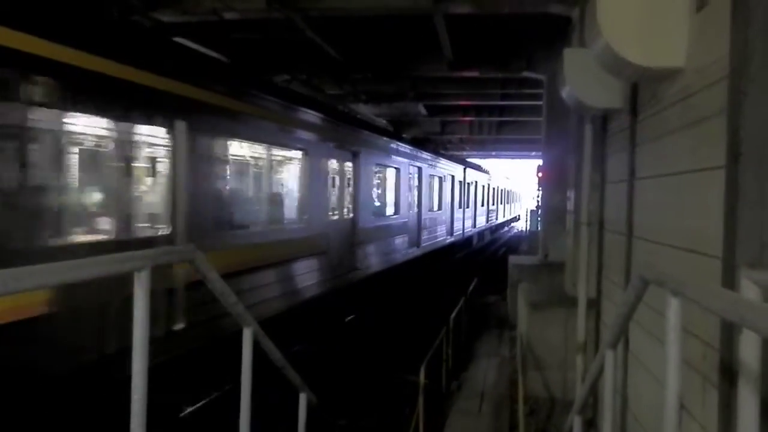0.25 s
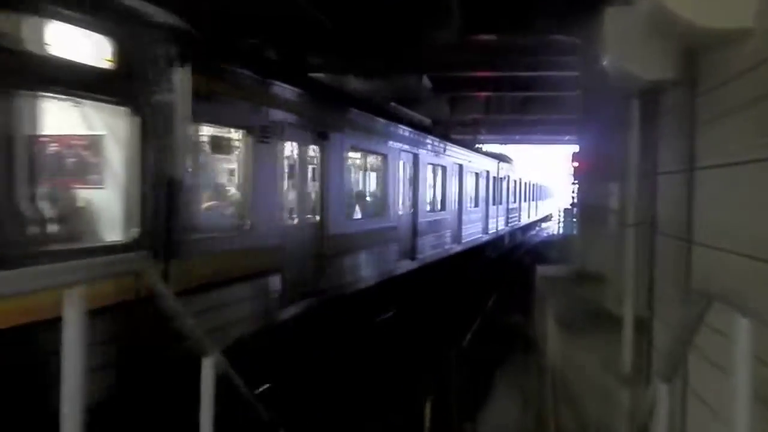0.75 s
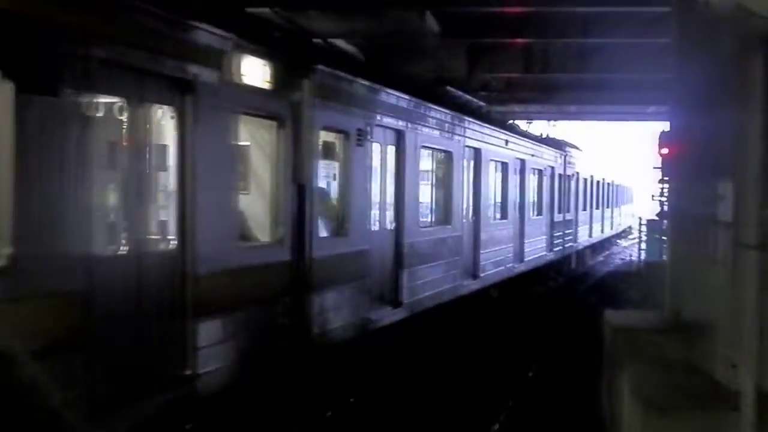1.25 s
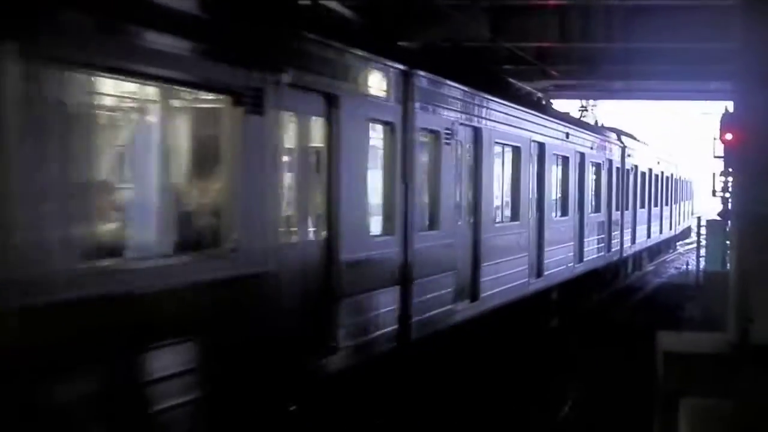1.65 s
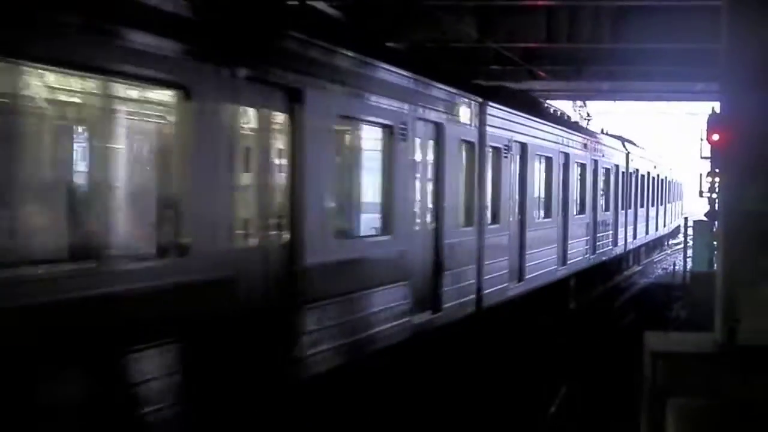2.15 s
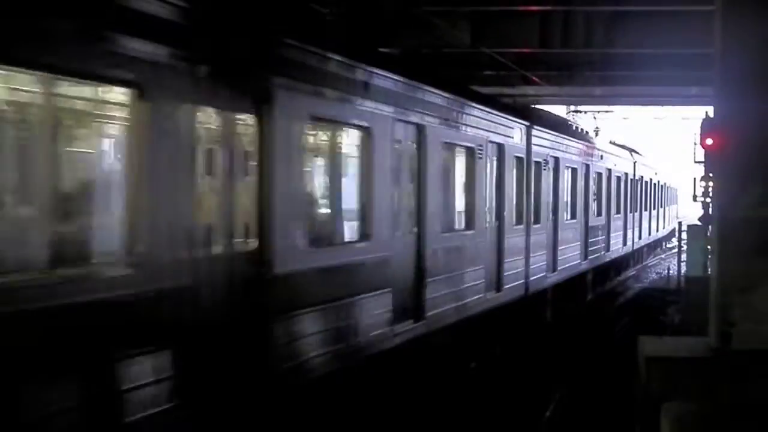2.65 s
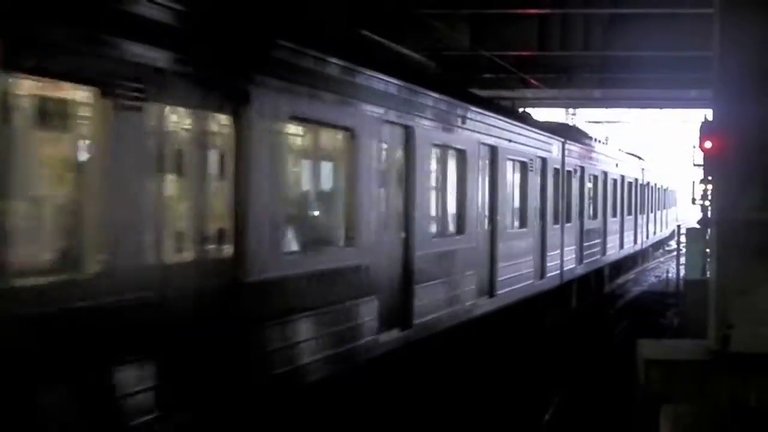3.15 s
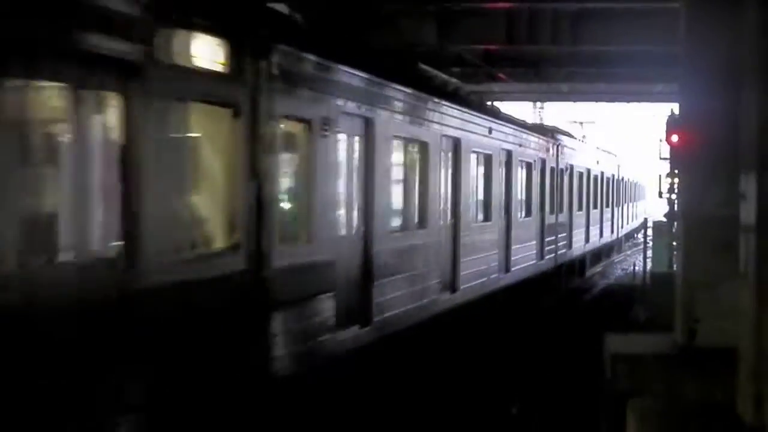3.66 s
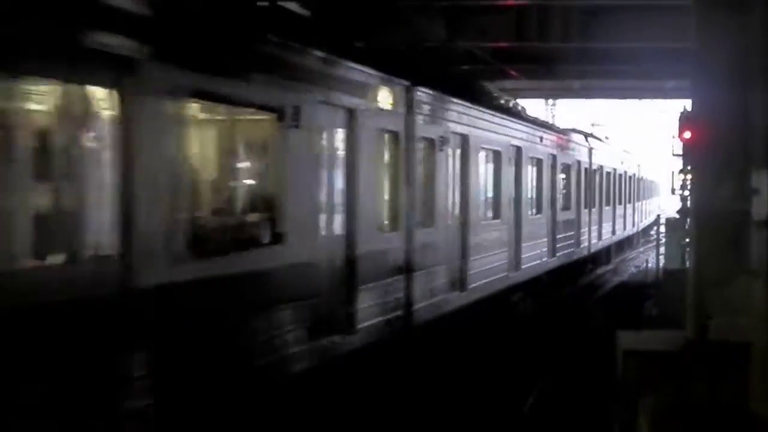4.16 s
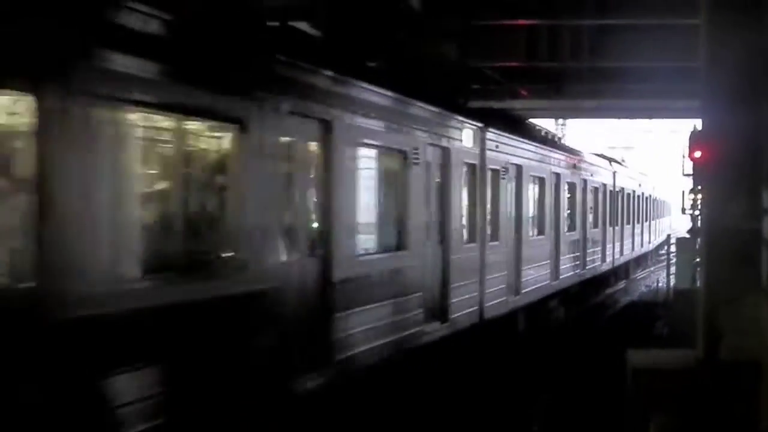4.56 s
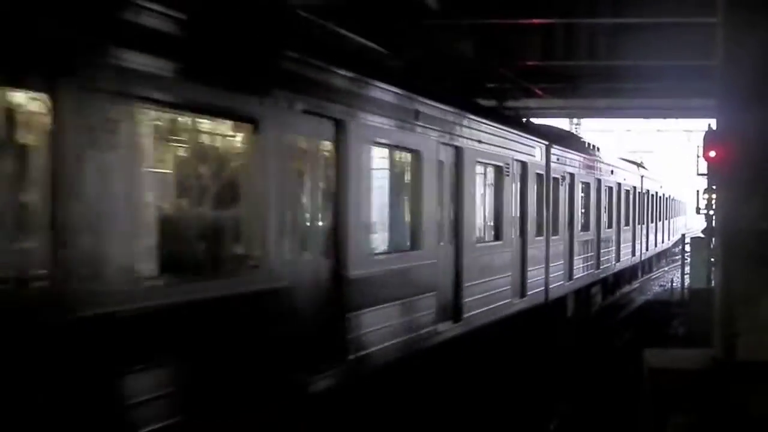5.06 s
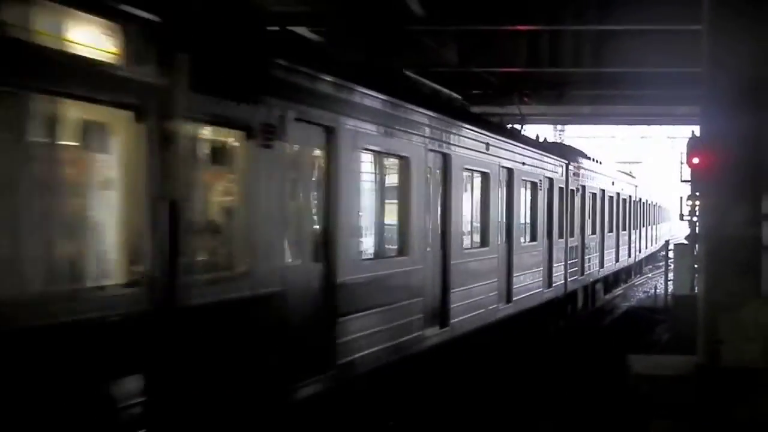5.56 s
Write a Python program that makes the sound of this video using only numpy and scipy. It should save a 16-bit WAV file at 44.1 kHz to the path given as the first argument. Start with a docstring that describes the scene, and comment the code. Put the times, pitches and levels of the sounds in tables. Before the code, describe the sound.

Close beside an accelerating commuter train: a nearly pure motor note climbs and throbs above rolling noise, briefly muffled, then a sharp handling tick.

```python
"""An electric train gathers speed beside a platform under a low roof, car after car passing close by.
From the start its motors sing one rising note, built from swept tones that swell, fade and beat;
rumble, wheel roar and rail hiss, made of coloured noise and resonances, lift as wheels go by.
For about the second from 0.5 s the microphone is muffled; near its end a tick rings the case.
The tick, and later the loudest motor swells, make the gain control duck and recover."""
import sys
import numpy as np
from scipy import signal
from scipy.fft import rfft, irfft
from scipy.io import wavfile
from scipy.ndimage import uniform_filter1d, minimum_filter1d

SR = 44100
rng = np.random.default_rng(int(sys.argv[2]) if len(sys.argv) > 2 else 0)


def unload_wav(signal):
    """Save mono or channel-first audio to the path in sys.argv[1] as 16-bit WAV at rate SR, clipped to [-1, 1]."""
    wavfile.write(
        sys.argv[1],
        SR,
        np.round(np.clip(np.atleast_2d(signal).T, -1, 1) * 32767).astype(np.int16),
    )


N = 255780

# Motor note, rising with the speed: t/s, f/Hz
MOTOR_PITCH = [(0, 262.3), (0.3, 264.5), (0.5, 262.4), (1.0, 271.7), (1.5, 278), (2.05, 281.3),
               (2.5, 285.5), (3.0, 289), (3.48, 292), (3.62, 298.3), (4.08, 299.5), (4.45, 312),
               (4.8, 316.2), (5.4, 323), (5.8, 335)]
# Overtones of the note, the highest a thin whine:
# multiple of the note, first level/dB, last level/dB, width/Hz
OVERTONES = [(2, -28, -33, 9), (3, -38, -40, 9), (4, -46.5, -47, 15), (15, -57.5, -45, 60)]
# The note swells as motors go by and their reflections fall into step: start t/s, end t/s, level/dB
MOTOR_SWELLS = [(-0.03, 0.03, -15), (0.044, 0.092, -7.5), (0.133, 0.173, -10.5), (0.25, 0.376, -12.5),
                (0.415, 0.462, -9.5), (0.6, 0.654, -17), (0.72, 0.738, -12), (0.783, 0.82, -17.5),
                (0.892, 1.07, -14.5), (1.145, 1.2, -16), (1.261, 1.303, -10.5), (1.325, 1.385, -15),
                (1.43, 1.52, -20), (1.561, 1.6, -7.5), (1.628, 1.669, -11), (1.714, 1.774, -7.5),
                (1.898, 2.025, -8), (2.112, 2.142, -3), (2.149, 2.22, -4.5), (2.225, 2.483, -10.5),
                (2.513, 2.528, 1), (2.592, 2.636, -7), (2.668, 2.82, -11), (2.858, 2.909, 0.5),
                (2.908, 2.979, -9), (2.986, 3.13, -5.5), (3.131, 3.245, -6), (3.336, 3.425, -7.5),
                (3.426, 3.504, -10.5), (3.533, 3.672, -13), (3.711, 3.858, -10), (3.875, 3.98, -11),
                (4.048, 4.315, -11.5), (4.409, 4.544, -13.5), (4.586, 4.78, -13), (4.82, 4.945, -17.5),
                (4.994, 5.117, -17), (5.25, 5.405, -16.5), (5.43, 5.65, -20), (5.693, 5.83, -17.5)]
# How fast a swell comes and goes, and the level between swells
SWELL_RISE_S, SWELL_FALL_S, MOTOR_LULL_DB = 0.013, 0.012, -24.5
# The other motors run slightly out of step and beat against the nearest
OTHER_MOTORS_DB, OTHER_MOTORS_DB_PER_S = -23.5, -0.5
BEAT_HZ, BEAT_SPREAD_HZ = 9, 5.1

# Ring of the microphone's case: f/Hz, width/Hz, level/dB (TICK_DB is added), time to fall 60 dB/s
CASE_MODES = [(1750, 380, 1, 0.016), (2180, 450, -6, 0.012), (2950, 700, -1, 0.014),
              (5600, 560, -9, 0.0072), (7170, 600, -4, 0.0085), (8500, 890, -4, 0.0057),
              (10200, 1200, -8.5, 0.0042), (15000, 3000, -3.5, 0.0039)]
TICK_S, TICK_DB = 1.3233, 1.5
# Colour of the dry snap of the touch: f/Hz, relative level per Hz/dB
SNAP_COLOUR = [(1000, -24), (1700, 5), (3500, 0), (4500, -18), (6300, -9), (15000, -19)]
SNAP_DB, SNAP_PEAK_S = -9, 0.00092

# Wheels go by, each shifting the running noise: t/s, time near/s, rumble lift/dB, roar lift/dB,
# hiss lift/dB, brightening of the hiss/dB
WHEEL_PASSES = [(0.04, 0.11, 4.5, 6.5, 9, 4.5), (0.31, 0.077, 6.5, 7, 9.7, 2.3),
                (1.0, 0.033, -2.5, 0.5, 1.5, -1.5), (1.27, 0.05, 1, -0.5, -2.5, 1.5),
                (2.07, 0.14, 4.5, 4, 3.3, 2.2), (2.47, 0.14, 7, 6, 5.5, 0), (2.76, 0.08, 6, 4, 4.5, -1),
                (2.845, 0.03, 5, 3.5, 4.5, 0), (3.18, 0.12, -2.5, 1, 0, -0.5),
                (3.63, 0.089, 3, 2.5, 2, 2.3), (3.85, 0.069, 5, 4, 4.5, 1.5), (4.08, 0.012, 0, 4.5, 1.5, 0),
                (4.18, 0.055, 6.5, 3.8, 1, 0), (4.45, 0.035, 3, 3, 3.5, 1), (4.53, 0.035, 5.5, 5, 5.5, 1.3),
                (4.64, 0.035, 2.5, 2.5, 3, 1.3), (4.87, 0.115, 3, 3.5, 3.5, 4), (5.15, 0.085, 2, 4, 4, 0.5),
                (5.29, 0.049, 3.5, 2, 4, -0.5), (5.5, 0.03, 2, 4, 2.5, 0), (5.68, 0.052, 3.5, 4, 1.5, -1.5)]
JUDDER_DB, JUDDER_HZ = 0.48, 28  # rough rail shakes roar and hiss together

# Colours of roar, rumble and hiss: f/Hz, relative level per Hz/dB
ROAR_COLOUR = [(200, -16.5), (340, 3), (430, -0.3), (560, -0.5), (660, -4.5), (790, -4.5), (960, -12.5),
               (1150, -14), (1500, -18.5), (2500, -65)]
RUMBLE_COLOUR = [(20, -28), (35, -21.5), (55, -7), (85, -0.5), (135, -5), (200, 2), (260, 3), (400, -6.5),
                 (800, -61)]
HISS_COLOUR = [(800, -10), (1400, -2), (1680, -3), (1930, -0.5), (2350, -2.5), (2900, -6.5), (3400, -7),
               (4600, -7.5), (5600, -11), (7900, -15), (9300, -25.5), (11200, -41.5), (12500, -60),
               (15500, -70)]
# Resonances of wheels and track, each growing or fading as the train moves on:
# f/Hz, width/Hz, first level/dB, last level/dB (against the roar)
WHEEL_MODES = [(641, 330, -28, -8.5), (786, 45, -15.5, -28.5), (947, 170, -36.5, -14),
               (1136, 140, -26.5, -21)]
# Resonances of the wheel rims: f/Hz, width/Hz, level/dB (RIM_DB and its growth are added)
RIM_MODES = [(1439, 120, -9), (1964, 220, -2.5), (2260, 240, -9), (2770, 710, -2.5)]
# Level at the start and its change per second, before the wheel passes
ROAR_DB, ROAR_DB_PER_S = -24.5, 0.83
RUMBLE_DB, RUMBLE_DB_PER_S = -25, 0.0
HISS_DB, HISS_DB_PER_S = -35.5, 1.2233
RIM_DB, RIM_DB_PER_S = -21, 3  # against the hiss
BRIGHT_DB, BRIGHT_DB_PER_S = 0.58, -0.5  # brightness of the hiss
# The hiss comes back once off the platform wall, by a path that shifts as the cars go by
WALL_DELAY_S, WALL_SWING_S, WALL_DB = 0.0063, 0.0001, -17
# The very top of the hiss: t/s, level/dB
SIZZLE_LEVEL = [(0, -60), (0.4, -63), (0.5, -72), (1.3, -71), (1.7, -82), (2.08, -63), (2.6, -77),
                (3.1, -75), (3.6, -62), (3.9, -56), (4.17, -75), (4.24, -62), (4.45, -55), (4.9, -52),
                (5.6, -67.5)]

# How far the microphone port is covered: t/s, share (0 to 1)
COVER = [(0.35, 0.54), (0.43, 0.68), (0.47, 0.97), (1.41, 1), (1.53, 0.33)]
# What a covered port lets through: f/Hz, level/dB
COVERED_COLOUR = [(300, 1), (1400, -2.5), (2300, -5), (3200, -10), (3900, -16), (4600, -25), (5500, -16.5),
                  (6500, -10.5), (8000, -3), (12000, 1)]
CUTOFF_HZ = 15800  # the treble ends here


def motors(waver_hz=2.02, shimmer_db=2.0, far_db=-15, echo_db=-18, echo_width_hz=9):
    """A nearly pure rising note beats with the other motors, with scattered echo and faint overtones."""
    pitch, = in_time(MOTOR_PITCH)
    level = motor_level()
    usual_level = uniform_filter1d(level, size=SR // 2)
    phase = 2 * np.pi * np.cumsum(pitch) / SR
    slower_phase = 2 * np.pi * np.cumsum(pitch - BEAT_HZ) / SR

    note = level * wandering(phase, waver_hz, rate_hz=12.2)
    others_gain = from_db(ramp(OTHER_MOTORS_DB, OTHER_MOTORS_DB_PER_S))
    others = others_gain * wandering(slower_phase, BEAT_SPREAD_HZ, rate_hz=15.1)
    echo = usual_level * from_db(echo_db) * diffuse(phase, echo_width_hz)

    overtones = np.zeros(N)
    for multiple, first_db, last_db, width_hz in OVERTONES:
        gain = from_db(np.linspace(first_db, last_db, N))
        overtones += gain * diffuse(multiple * phase, width_hz)

    # The farther the motors, the more their note flickers among the walls
    farness = np.minimum(from_db(far_db) / usual_level, 1)
    flicker_db = shimmer_db * farness * np.tanh(drift(19))
    return (note + others + echo) * from_db(flicker_db) + overtones


def motor_level():
    """Strength of the nearest motors: each swell rises out of the lull, holds and sinks back."""
    t = np.arange(N) / SR
    lull = from_db(MOTOR_LULL_DB)
    level = np.full(N, lull)
    for start, end, db in MOTOR_SWELLS:
        rise = (1 + np.tanh((t - start) / SWELL_RISE_S)) / 2
        fall = (1 - np.tanh((t - end) / SWELL_FALL_S)) / 2
        level += (from_db(db) - lull) * rise * fall
    return level


def case_tick(rise_cycles=3.7):
    """A hard, gritty touch snaps and rings the small case for milliseconds; low modes build up last."""
    age = np.maximum(np.arange(N) / SR - TICK_S, 0)
    grit = rms_one(coloured(rng.standard_normal(N), SNAP_COLOUR))
    snap_shape = age / SNAP_PEAK_S * np.exp(1 - age / SNAP_PEAK_S)
    tick = from_db(SNAP_DB) * grit * snap_shape
    for hz, width_hz, db, t60 in CASE_MODES:
        straying_hz = hz + width_hz / 2 * drift(width_hz / 2)
        phase = 2 * np.pi * np.cumsum(straying_hz) / SR
        rise = np.minimum(age * hz / rise_cycles, 1)
        fallen_db = np.minimum(60 * age / t60, 300)
        tick += rise * from_db(TICK_DB + db - fallen_db) * np.sin(phase)
    return tick


def running_gear():
    """Wheels roar and ring on the rail, car bodies rumble, the contact hisses."""
    rumble_lift_db, roar_lift_db, hiss_lift_db, brighten_db = wheel_passes()
    judder_db = JUDDER_DB * drift(JUDDER_HZ)
    roar = wheel_roar(roar_lift_db + judder_db)
    rumble = body_rumble(rumble_lift_db)
    hiss = rail_hiss(hiss_lift_db + judder_db, brighten_db)
    return roar + rumble + off_the_wall(hiss) + sizzle()


def wheel_passes():
    """Shift in dB of rumble, roar, hiss and brightness, coming and going around each wheel pass."""
    t = np.arange(N) / SR
    shifts_db = np.zeros((4, N))
    for s, near_s, *pass_db in WHEEL_PASSES:
        nearness = np.exp(-0.5 * ((t - s) / near_s) ** 2)
        shifts_db += np.outer(pass_db, nearness)
    return shifts_db


def wheel_roar(lift_db):
    """Rolling shakes wheels and track: broad noise plus resonances that grow or fade."""
    roar = noise(ROAR_COLOUR, flutter_db=0.9, flutter_hz=26)
    for hz, width_hz, first_db, last_db in WHEEL_MODES:
        roar += from_db(np.linspace(first_db, last_db, N)) * resonance(hz, width_hz)
    return from_db(ramp(ROAR_DB, ROAR_DB_PER_S) + lift_db) * roar


def body_rumble(lift_db):
    """Car bodies shake at random: low noise with a slightly uneven level."""
    level_db = ramp(RUMBLE_DB, RUMBLE_DB_PER_S) + lift_db
    return from_db(level_db) * noise(RUMBLE_COLOUR, flutter_db=0.74, flutter_hz=13.0)


def rail_hiss(lift_db, brighten_db):
    """Wheel on rail makes high contact noise and shakes the wheel rims into ringing."""
    contact = contact_noise(ramp(BRIGHT_DB, BRIGHT_DB_PER_S) + brighten_db)
    rims = sum(from_db(db) * resonance(hz, width_hz) for hz, width_hz, db in RIM_MODES)
    rims = from_db(ramp(RIM_DB, RIM_DB_PER_S)) * rims
    return from_db(ramp(HISS_DB, HISS_DB_PER_S) + lift_db) * (contact + rims)


def contact_noise(bright_db, pivot_hz=3000):
    """Noise split in two: brightness lifts the treble and lowers the dull part by half as many dB."""
    hiss = noise(HISS_COLOUR, flutter_db=0.5, flutter_hz=7.7)
    dull = coloured(hiss, [(pivot_hz / 2, 0), (pivot_hz, -6), (2 * pivot_hz, -24)])
    return dull * from_db(-bright_db / 2) + (hiss - dull) * from_db(bright_db)


def off_the_wall(x):
    """A sound with its reflection, which lays a slowly moving ripple on its colour."""
    n = np.arange(N)
    delay_s = WALL_DELAY_S + WALL_SWING_S * drift(0.5)
    reflection = np.interp(n - delay_s * SR, n, x, left=0)
    return x + from_db(WALL_DB) * reflection


def sizzle():
    """The very top of the hiss: fluttering high noise that follows its own level curve."""
    level_db, = in_time(SIZZLE_LEVEL)
    return from_db(level_db) * noise([(8000, -31.0), (11000, -0.5)], flutter_db=3.0, flutter_hz=12)


def through_port(x):
    """A partly covered microphone port mixes the open sound with the muffled one."""
    cover = np.clip(in_time(COVER)[0], 0, 1)
    return (1 - cover) * x + cover * coloured(x, COVERED_COLOUR)


def gain_control(x, sense_hz=5000, treble_ceiling_db=-17.0, ceiling_db=-4.0, recovery_s=0.4):
    """Loud swells and sharp treble peaks pull the gain down at once; it creeps back up."""
    highpass = signal.butter(2, sense_hz, "high", fs=SR, output="sos")
    treble = signal.sosfilt(highpass, x)
    overall_load = np.abs(x) / from_db(ceiling_db)
    treble_load = np.abs(treble) / from_db(treble_ceiling_db)
    load = np.maximum(overall_load, treble_load)
    over_db = 20 * np.log10(np.maximum(load, 1))
    # Hold each peak while it fades with the recovery time
    growth = np.exp(np.arange(N) / SR / recovery_s)
    held_db = np.maximum.accumulate(over_db * growth) / growth
    # Look about a millisecond ahead, and smooth the dip
    gain_db = uniform_filter1d(minimum_filter1d(-held_db, size=65), size=65)
    return x * from_db(gain_db)


def wandering(phase, spread_hz, rate_hz):
    """A tone of steady strength whose pitch strays at random; rms 1."""
    stray = 2 * np.pi * np.cumsum(spread_hz * drift(rate_hz)) / SR
    return np.sqrt(2) * np.sin(phase + stray)


def diffuse(phase, width_hz):
    """A tone arriving by many shifting paths: its strength and phase wander; rms near 1."""
    return drift(width_hz) * np.cos(phase) + drift(width_hz) * np.sin(phase)


def resonance(hz, width_hz):
    """A part that rings at one pitch, shaken at random; rms near 1."""
    return diffuse(2 * np.pi * hz * np.arange(N) / SR, width_hz / 2)


def noise(colour, flutter_db, flutter_hz):
    """Coloured noise with an uneven level; rms 1."""
    steady = coloured(rng.standard_normal(N), colour)
    return rms_one(steady * from_db(flutter_db * drift(flutter_hz)))


def drift(rate_hz):
    """Slow random wandering of rms 1, changing about rate_hz times a second."""
    bins_hz = np.arange(N // 2 + 1) * SR / N
    lowpass = (bins_hz > 0) / (1 + (bins_hz / rate_hz) ** 2)
    return rms_one(irfft(rfft(rng.standard_normal(N)) * lowpass, N))


def coloured(x, points):
    """Filter by a curve of (f/Hz, level/dB) points, joined on a log frequency scale."""
    hz, db = np.transpose(points)
    bins_hz = np.maximum(np.arange(N // 2 + 1) * SR / N, 1)
    gain = from_db(np.interp(np.log(bins_hz), np.log(hz), db))
    return irfft(rfft(x) * gain, N)


def in_time(rows):
    """The columns of a timed table, sample by sample."""
    s, *columns = np.transpose(rows)
    return [np.interp(np.arange(N) / SR, s, column) for column in columns]


def ramp(start, per_s):
    """A value that changes steadily as the train gathers speed."""
    return start + per_s * np.arange(N) / SR


def rms_one(x):
    """Scale to an rms of 1."""
    return x / np.sqrt(np.mean(np.abs(x) ** 2) + 1e-20)


def from_db(db):
    """Decibels to gain."""
    return 10 ** (np.asarray(db) / 20)


def scene():
    """The train as heard through the microphone port, and the tick on the case."""
    train = motors() + running_gear()
    return (through_port(train) + case_tick())[None]


def record(dry):
    """Gain control, then a steep treble cut."""
    lowpass = signal.ellip(10, 0.1, 90, CUTOFF_HZ, fs=SR, output="sos")
    return signal.sosfilt(lowpass, gain_control(dry[0]))[None]


dry = scene()
out = record(dry)
unload_wav(out)
```